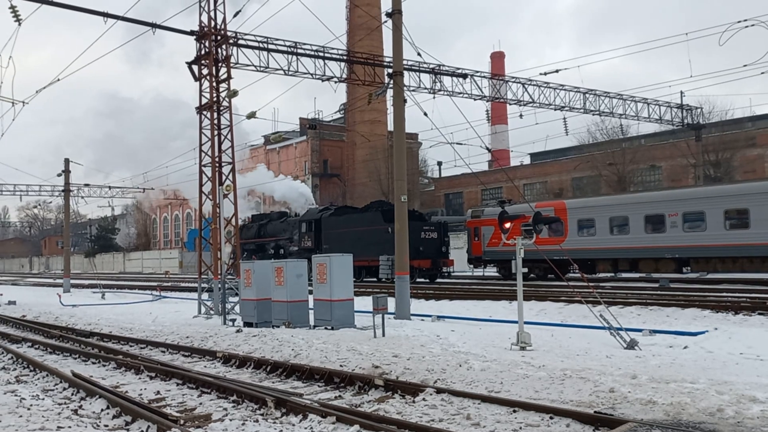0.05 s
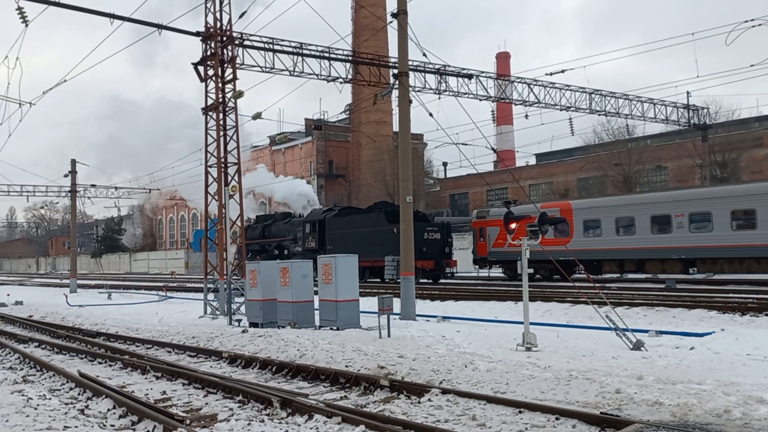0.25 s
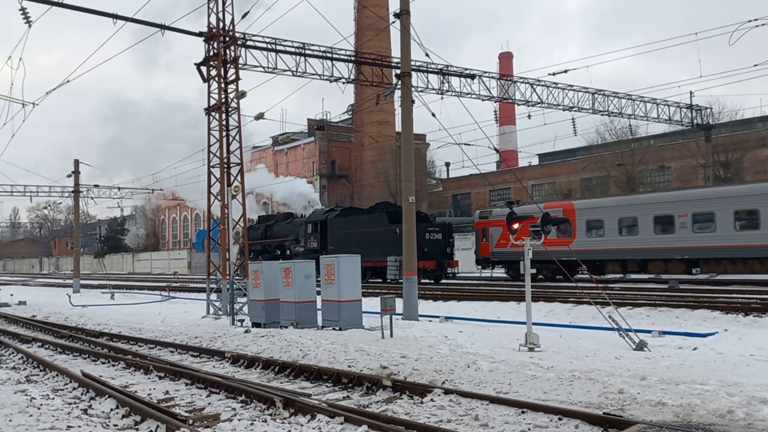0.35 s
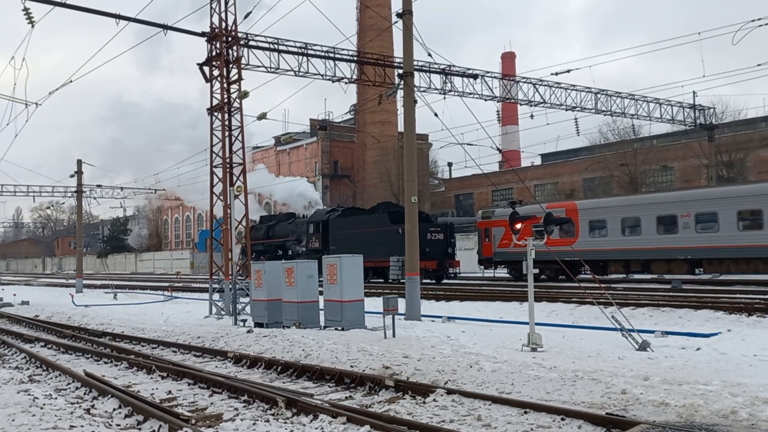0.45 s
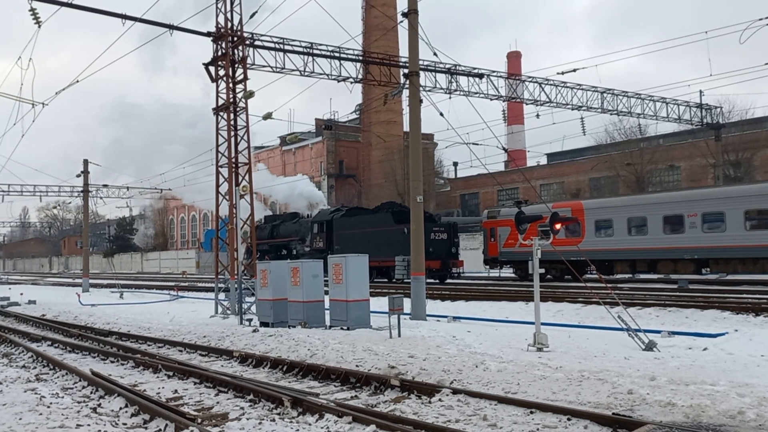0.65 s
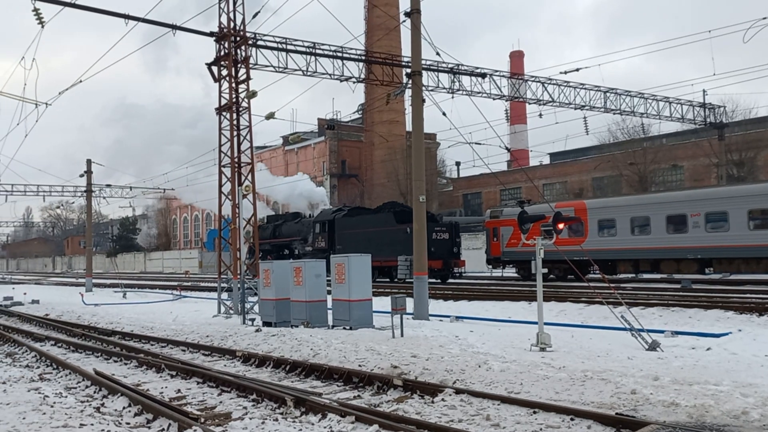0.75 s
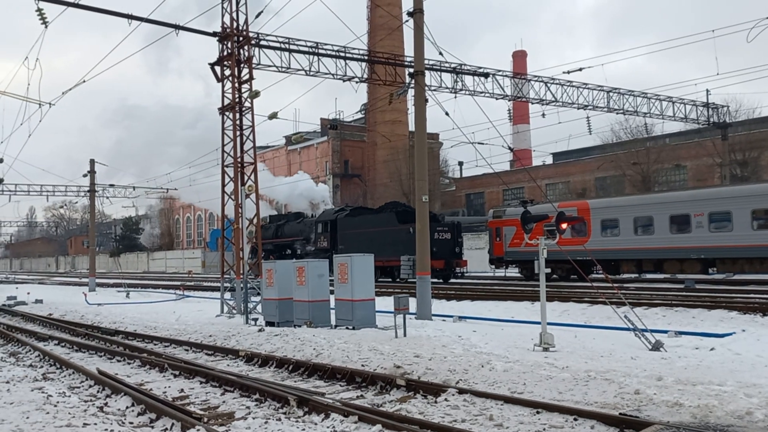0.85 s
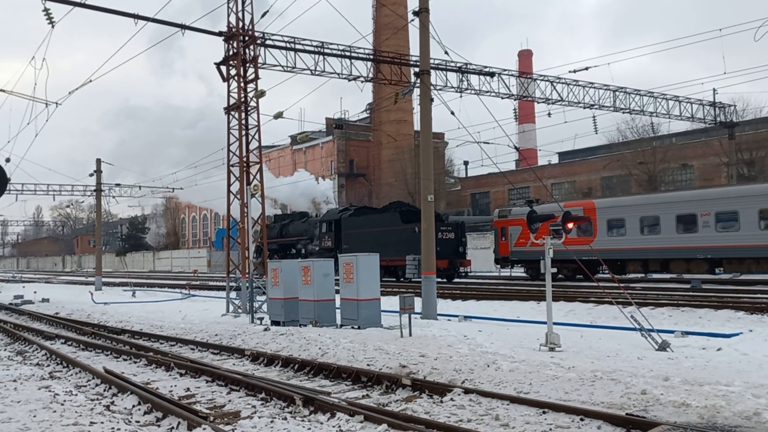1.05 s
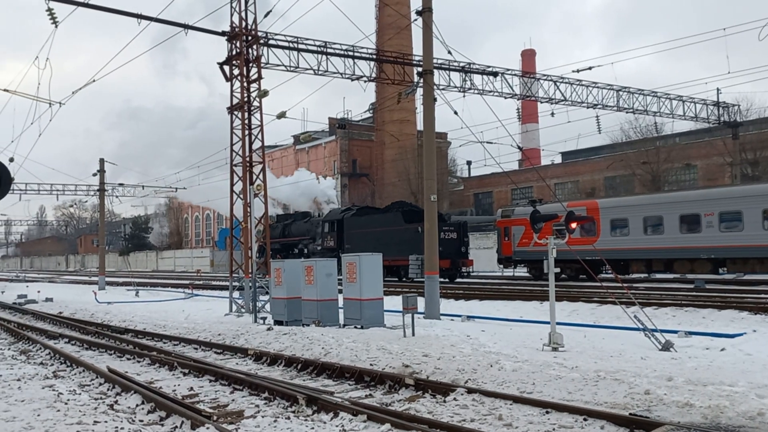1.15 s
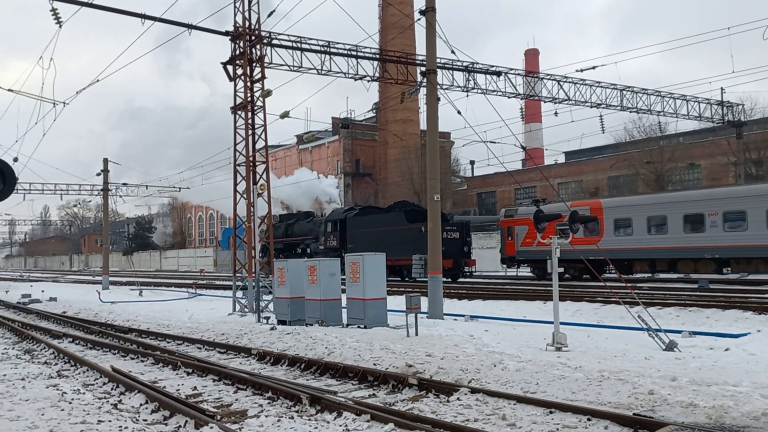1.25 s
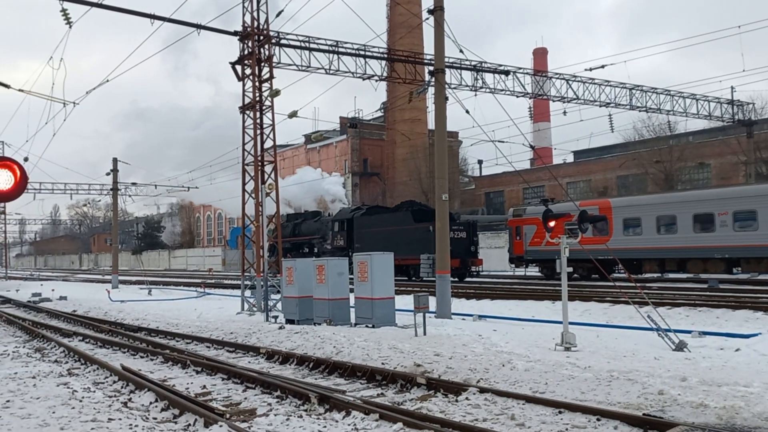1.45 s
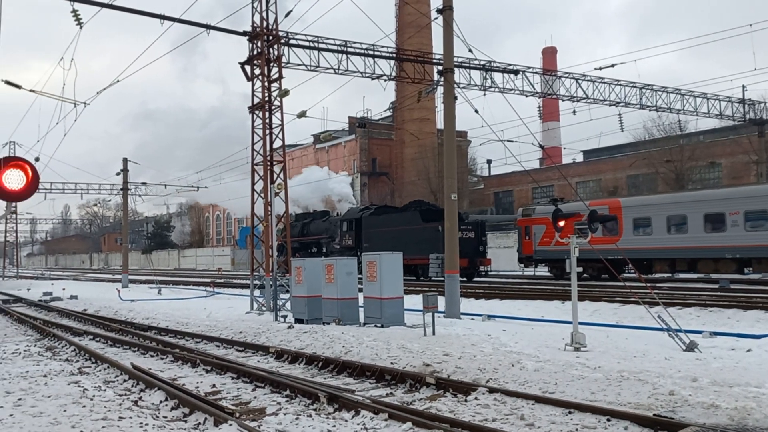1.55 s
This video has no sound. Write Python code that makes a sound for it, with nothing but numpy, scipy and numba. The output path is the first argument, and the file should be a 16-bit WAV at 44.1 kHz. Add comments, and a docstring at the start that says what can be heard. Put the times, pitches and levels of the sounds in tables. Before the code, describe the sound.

Steam locomotive whistle gives two loud shrill blasts, short then longer, echoing over a rumbling rail yard

```python
"""Engines rumble and whine in a rail yard, then a steam locomotive whistles, first briefly, then longer.
Each blast is one pipe tone, a harmonic series with strong third and sixth partials, plus a hissing steam jet.
Wagons and walls return dull echoes and a diffuse ring; wind buffets the microphone and a thin leak swells last.
The rumble and whine are filtered noise and wavering sines.
The recorder's gain control ducks them from the first blast on."""
import sys
import numpy as np
from scipy import signal
from scipy.fft import rfft, irfft
from scipy.io import wavfile
from scipy.ndimage import uniform_filter1d
from numba import njit

SR = 44100
rng = np.random.default_rng(int(sys.argv[2]) if len(sys.argv) > 2 else 0)


def generate_wav(sig):
    """Save sig (samples, or channels by samples) to the path in sys.argv[1] as 16-bit PCM at SR."""
    pcm = np.round(np.clip(np.atleast_2d(sig).T, -1, 1) * 32767).astype(np.int16)
    wavfile.write(sys.argv[1], SR, pcm)


N = 70560  # samples, 1.6 s

# Spectrum of idling engines and yard noise: f/Hz, relative density level/dB
YARD_SPECTRUM = [(18, -57), (30, -34), (92, -4), (177, -13.5), (284, -7), (443, 0), (591, -2.5),
                 (656, -5.5), (728, -10.5), (970, -13.5), (1590, -15), (1720, -6.5), (2910, -23),
                 (3400, -19.5), (5040, -27), (5740, -29), (8500, -38), (12900, -40), (15500, -38)]
RUMBLE_DB, RUMBLE_WAVER_DB = -32.5, 1.68  # mean level, rms wavering
RUMBLE_SHARED = 0.29  # share of the rumble's power common to both ports
BACKGROUND_LOW_HZ = 47.6  # bass limit of engines and wind
# Steady machine tones: f/Hz, level/dB
WHINE_TONES = [(108, -58.5), (519, -46.5), (1498, -52), (1706, -49.5), (3460, -57), (5642, -57)]

# Low wind buffets on the microphone: t/s, length/s, level/dB
WIND_BUFFETS = [(0.09, 0.086, -48), (0.223, 0.0083, -37), (0.41, 0.0091, -37), (1.257, 0.013, -35.5),
                (1.464, 0.12, -42.5), (1.603, .03, -33.5)]

# Course of each blast, one list per blast: t/s, f/Hz of the third harmonic,
# steam flow as hiss level/dB, overtone level/dB, fundamental level/dB
BLAST_COURSES = [
    [(0.218, 1931, -52, -30, -31), (0.234, 1936, -36, -24, -29.5), (0.276, 1915, -30, -21, -29),
     (0.326, 1898, -31, -23.5, -27.5), (0.358, 1898, -33, -25, -32), (0.392, 1881, -44.5, -29.5, -29),
     (0.416, 1889, -43.5, -37.5, -59.5), (0.46, 1881, -56, -43, -28.5)],
    [(0.547, 1904, -42, -32, -32), (0.577, 1924, -36.5, -24.5, -28.5), (0.621, 1909, -30, -25, -35),
     (0.669, 1894, -33.5, -25, -27), (0.721, 1893, -38.5, -31.5, -30.5), (0.751, 1919, -36.5, -23, -24.5),
     (0.795, 1895, -31, -28.5, -24), (0.849, 1900, -33, -24, -24), (0.889, 1896, -37, -26, -26),
     (0.935, 1881, -46, -39, -44.5), (0.97, 1888, -55, -39, -34)],
]
FULL_FLOW_DB, FULL_TONE_DB, FULL_BASE_DB = -29.5, -20.5, -26.5  # zero points of the three level columns
# Pipe harmonics: multiple of the fundamental, relative level/dB, left minus right level/dB
PIPE_HARMONICS = [(1, -18, 2), (2, -34.5, 1), (3, -15, 6), (4, -22.5, 6), (5, -21.5, 4.5), (6, -18.5, 6),
                  (7, -20, 0), (8, -20, 3), (9, -26, -1), (10, -31.5, 14), (11, -29.5, 6), (12, -40, 12.5),
                  (14, -42.5, 17.5), (15, -37, 6), (16, -47, -4), (17, -41.5, 24), (18, -41.5, -4),
                  (19, -50, -2)]
TONE_DB = 8  # gain common to all harmonics
# dB of an overtone per dB of the tone: constant part, and increase per harmonic number
FOLLOW_FLOW, FOLLOW_PER_HARMONIC = 0.23, 0.1
ATTACK_S, RELEASE_S = 0.013, 0.059
SCOOP_HZ = 22.13  # how far below pitch the fundamental starts
JITTER, FLUTTER_DB = 0.0038, 0.98  # rms relative frequency, rms level of each harmonic
TURBULENCE = 0.05  # rms of each quadrature of the random modulation

# Spectrum of the steam jet: f/Hz, relative density level/dB
JET_SPECTRUM = [(300, -14), (900, -12.5), (1600, 0.5), (2250, -11), (3000, 2.5), (4200, 6), (5000, 8),
                (5700, 2.5), (7000, -2.5), (8800, -5), (11300, 3), (13500, 0), (15500, 2.5)]
JET_DB, JET_PAN_DB = -16, 4  # gain at full flow, left minus right of the part common to both ports
JET_SCATTER_DB = -0.5  # steam noise from all around
JET_PULSING = 0.4  # modulation depth at the pipe's fundamental
JET_COMB = 0.45  # share of the steam noise that returns from the pipe one period later
PORT_LAG_S = 0.0005  # delay of the right microphone port

# Reflections from wagons and walls: delay t/s, level/dB, left minus right level/dB
WALL_ECHOES = [(.092, -14, 2), (.16, -19, -1)]
ECHO_TOP_HZ = 2150
RING_DB, RING_T60_S, RING_TOP_HZ, RING_ONSET_S = -11.5, 1.32, 2230, 0.049

# Course of the thin steam leak: t/s, level/dB of its narrow band
LEAK_COURSE = [(.2, -59), (1.15, -52.5), (1.32, -51), (1.36, -42.5), (1.45, -45.5), (1.53, -43), (1.6, -45)]
LEAK_HZ, LEAK_WIDTH_HZ = 13000, 1400
LEAK_SKIRT_DB = -2  # broad part relative to the narrow band

AGC_DB, AGC_RATIO, AGC_ATTACK_S, AGC_RELEASE_S = -20.5, 3.06, 0.018, 4.5
CEILING, TOP_HZ = 0.95, 15650  # amplitude limit, treble limit


def undb(db):
    """An amplitude ratio is ten to the power of its level over 20."""
    return 10 ** (np.asarray(db) / 20)


def unit(x):
    """Normalization divides a signal by its rms value."""
    return x / np.sqrt(np.mean(x ** 2))


def lowpass(x, hz, order=2):
    """A Butterworth low-pass attenuates treble smoothly."""
    sections = signal.butter(order, min(hz, 0.45 * SR), fs=SR, output="sos")
    return signal.sosfilt(sections, x)


def highpass(x, hz):
    """A third-order Butterworth high-pass attenuates bass."""
    return signal.sosfilt(signal.butter(3, hz, "high", fs=SR, output="sos"), x)


def noise(points):
    """Spectral shaping of white noise, with levels interpolated over log frequency, to rms 1."""
    hz, db = np.array(points, float).T
    f = np.maximum(np.fft.rfftfreq(N, 1 / SR), 1)
    gain = undb(np.interp(np.log(f), np.log(hz), db))
    return unit(irfft(rfft(rng.standard_normal(N)) * gain, N))


def band(hz, width_hz):
    """A resonance curve selects one band of white noise, to rms 1."""
    f = np.fft.rfftfreq(N, 1 / SR)
    resonance = 1 / (1 + ((f - hz) / width_hz * 2) ** 2)
    return unit(irfft(rfft(rng.standard_normal(N)) * resonance, N))


def walk(rate_hz):
    """Low-passed white noise is a smooth random fluctuation, here of rms 1."""
    return unit(lowpass(rng.standard_normal(N), rate_hz))


def delay(x, s):
    """Propagation over a longer path shifts a signal in time."""
    return np.concatenate([np.zeros(int(s * SR)), x])[:N]


def place(x, pan_db, lag_s=0.0):
    """Stereo direction is a level and time difference between the two ports."""
    left = x * undb(pan_db / 2)
    right = delay(x, lag_s) * undb(-pan_db / 2)
    return np.array([left, right])


def engines(t):
    """Partly coherent random noise of wavering level, with narrow-band machine tones."""
    common = place(noise(YARD_SPECTRUM), pan_db=4.5)
    separate = np.array([noise(YARD_SPECTRUM), noise(YARD_SPECTRUM)])
    rumble = np.sqrt(RUMBLE_SHARED) * common + np.sqrt(1 - RUMBLE_SHARED) * separate
    whine = 0
    for hz, db in WHINE_TONES:
        amplitude = np.sqrt(2) * undb(db + 1.04 * walk(7.7))
        phase = 2 * np.pi * np.cumsum(hz + 0.6 * walk(21)) / SR
        whine = whine + amplitude * np.sin(phase)
    return rumble * undb(RUMBLE_DB + RUMBLE_WAVER_DB * walk(18)) + whine


def wind(t):
    """Buffeting is low noise under Gaussian envelopes, incoherent between ports and stronger on the left."""
    gust = sum(undb(db) * np.exp(-((t - s) / length) ** 2) for s, length, db in WIND_BUFFETS)
    return gust * np.array([undb(3.5) * band(134, 130), undb(-3) * band(126, 90)])


def jet(pitch_hz):
    """Jet noise added to itself one pipe period later forms a comb spectrum, a ringing in the pipe."""
    common = place(noise(JET_SPECTRUM), JET_PAN_DB, PORT_LAG_S)
    scattered = np.array([noise(JET_SPECTRUM), noise(JET_SPECTRUM)])
    hiss = common + undb(JET_SCATTER_DB) * scattered
    return hiss + JET_COMB * np.roll(hiss, int(SR / pitch_hz), axis=1)


def whistle(t, blast):
    """A blown pipe scoops up to pitch and its overtones grow with loudness; the jet pulses at its fundamental."""
    at, third_hz, flow, tone, base = np.array(blast).T
    pitch = third_hz / 3
    attack = np.clip((t - at[0]) / ATTACK_S + 1, 0, 1) ** 2
    gate = attack * np.exp(-np.maximum(t - at[-1], 0) / RELEASE_S)
    flow_db = np.interp(t, at, flow) - FULL_FLOW_DB
    tone_db = np.interp(t, at, tone) - FULL_TONE_DB
    base_db = np.interp(t, at, base) - FULL_BASE_DB

    scoop = SCOOP_HZ * np.exp(-np.maximum(t - at[0] + ATTACK_S, 0) / ATTACK_S)
    hz = (np.interp(t, at, pitch) - scoop) * (1 + JITTER * walk(218))
    phase = 2 * np.pi * np.cumsum(hz) / SR

    pipe = 0
    for k, db, pan_db in PIPE_HARMONICS:
        follow_share = min(FOLLOW_FLOW + FOLLOW_PER_HARMONIC * k, 1)
        swell_db = base_db if k == 1 else tone_db * follow_share
        size = undb(TONE_DB + db + swell_db + FLUTTER_DB * walk(21))
        # random amplitude and phase modulation
        turbulence = TURBULENCE * (walk(80) + 1j * walk(120))
        partial = np.real((1 + turbulence) * np.exp(1j * k * phase))
        pipe = pipe + place(gate * size * partial, pan_db, PORT_LAG_S)

    pulsing = 1 + JET_PULSING * np.cos(phase)
    return pipe + gate * undb(JET_DB + flow_db) * pulsing * jet(pitch.mean())


def reflections(t, x):
    """Discrete reflections from wagons and walls, then a diffuse field of exponential decay."""
    dull = lowpass(x, ECHO_TOP_HZ, order=1)
    echoes = sum(place(delay(dull, s) * undb(db), pan_db, PORT_LAG_S) for s, db, pan_db in WALL_ECHOES)
    decay = undb(-60 * t / RING_T60_S) * (1 - np.exp(-t / RING_ONSET_S))
    # impulse response with a mean energy of 1 per port
    response = unit(rng.standard_normal((2, N)) * decay) / np.sqrt(N)
    ring = signal.fftconvolve(lowpass(x, RING_TOP_HZ)[None], response, axes=1)[:, :N]
    return echoes + undb(RING_DB) * ring


def leak(t):
    """Escaping steam radiates a narrow high noise band on a broad skirt, swelling after the blasts."""
    ports = [band(LEAK_HZ, LEAK_WIDTH_HZ) + undb(LEAK_SKIRT_DB) * band(8320, 17000) for _ in range(2)]
    return np.array(ports) * undb(np.interp(t, *np.array(LEAK_COURSE).T))


def scene():
    """Superposition of the yard, the whistle, its reflections and the leak."""
    t = np.arange(N) / SR
    background = highpass(engines(t) + wind(t), BACKGROUND_LOW_HZ)
    direct = sum(whistle(t, blast) for blast in BLAST_COURSES)
    return background + direct + reflections(t, direct[0]) + leak(t)


@njit
def follow(x, attack, release):
    """A level detector is a one-pole smoother with a fast rise and a slow fall."""
    out, e = np.empty(len(x)), 0.
    for i in range(len(x)):
        e += (x[i] - e) * (attack if x[i] > e else release)
        out[i] = e
    return out


def record(dry):
    """Compression ducks under the whistle and recovers slowly; saturation rounds peaks, a filter cuts the top."""
    power = uniform_filter1d(np.mean(dry ** 2, axis=0), size=128)
    loud = follow(np.sqrt(np.abs(power)), 1 / (AGC_ATTACK_S * SR), 1 / (AGC_RELEASE_S * SR))
    excess = np.maximum(loud / undb(AGC_DB), 1)
    ducked = dry * excess ** (1 / AGC_RATIO - 1)
    rounded = ducked / (1 + (ducked / CEILING) ** 6) ** (1 / 6)
    return signal.sosfilt(signal.ellip(14, 0.2, 90, TOP_HZ, fs=SR, output="sos"), rounded)


dry = scene()
out = record(dry)
generate_wav(out)
```